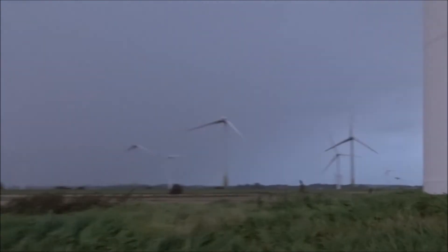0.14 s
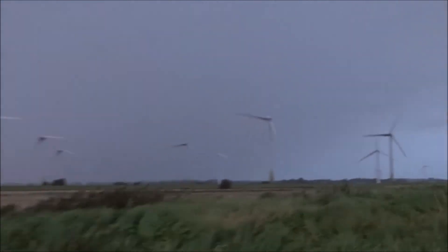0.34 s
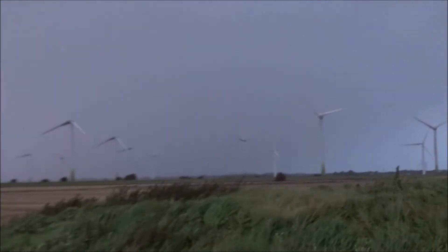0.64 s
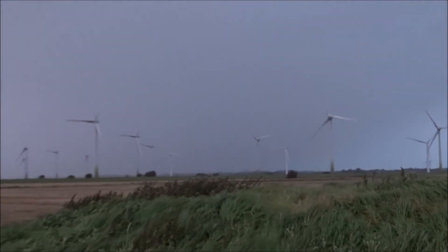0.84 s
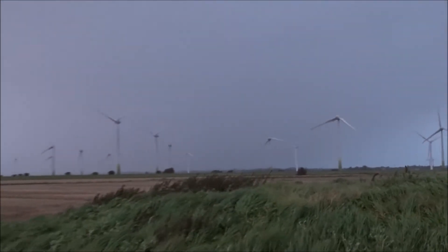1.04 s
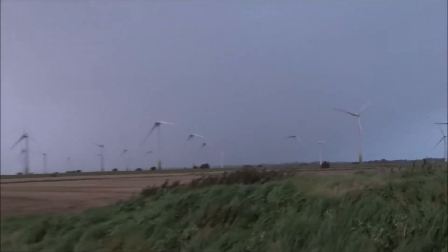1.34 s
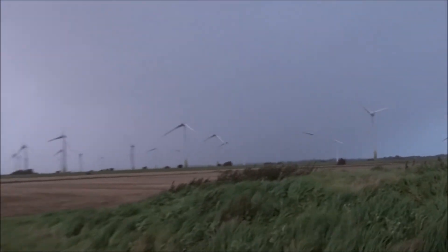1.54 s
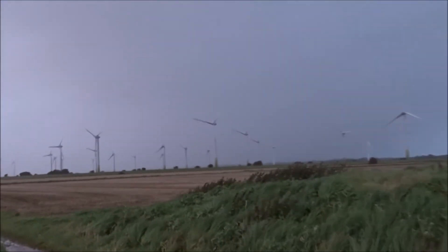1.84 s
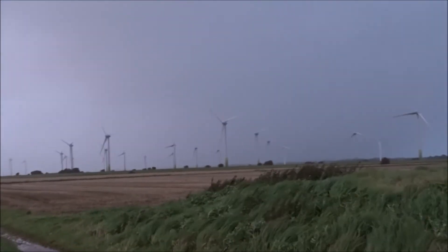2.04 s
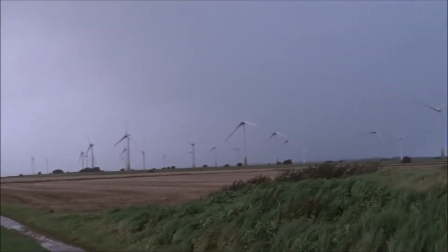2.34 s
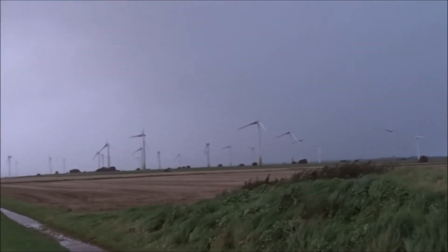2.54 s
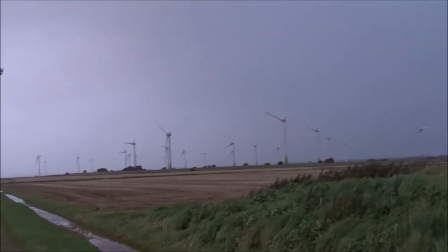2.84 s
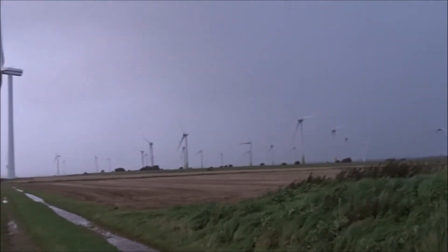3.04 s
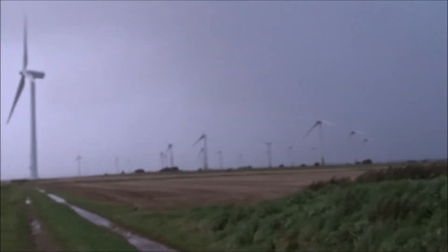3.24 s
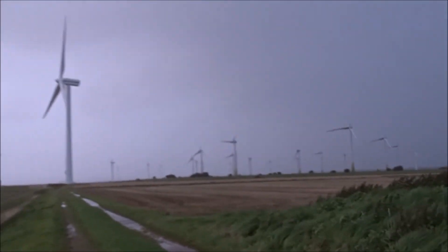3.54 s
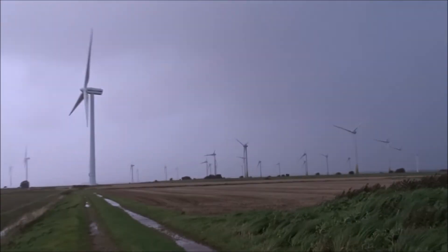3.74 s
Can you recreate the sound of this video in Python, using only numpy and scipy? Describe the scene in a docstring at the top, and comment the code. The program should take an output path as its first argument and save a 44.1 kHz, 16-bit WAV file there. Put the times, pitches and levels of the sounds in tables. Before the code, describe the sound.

Storm wind blows straight onto the microphone outdoors, a low, ragged roar with short crackles. It swells, dips to let a soft hiss of grass through, then returns in one hard gust and blows on more gently.

```python
"""Storm gusts cross an open field and buffet the two microphone ports of a hand-held camera.
From the start, one wind strength drives a rumble, a fluttering roar, a ragged tearing and a sizzle,
and the hardest eddies (swirls of air) spit. The gusts build between 1.2 and 2 s. In the lull after that,
long grass hisses beside the camera, over the faint rush of the open land. A hard gust hits at 2.7 s,
then the wind blows on more gently and the grass fades out at the end."""
import sys
import numpy as np
from scipy import signal
from scipy.fft import rfft, irfft, next_fast_len
from scipy.io import wavfile
from scipy.ndimage import uniform_filter1d, map_coordinates

SR = 44100
rng = np.random.default_rng(int(sys.argv[2]) if len(sys.argv) > 2 else 0)


def inscribe(sig):
    """Save sig as 16-bit PCM at rate SR to the path in sys.argv[1].

    A 1-D sig is mono; a 2-D sig holds one channel per row.
    Samples are clipped to [-1, 1] before scaling.
    """
    pcm = np.round(np.clip(np.atleast_2d(sig).T, -1, 1) * 32767)
    wavfile.write(sys.argv[1], SR, pcm.astype(np.int16))


N = 171108

# how alike the wind sounds at the two ports: pitch_hz, likeness (-1 opposite, 1 the same)
PORT_LIKENESS = [(40, .94), (90, .87), (140, .64), (220, 0), (380, -.6), (750, -.74), (1400, -.6),
                 (2200, -.35), (3200, .06), (5000, .55), (8000, .68), (14000, .75)]
# which side the wind is louder on: pitch_hz, left_minus_right_db
PORT_BALANCE = [(30, 1.3), (80, 3.5), (170, 6.3), (350, 4.3), (700, -.3), (1400, -1.7), (3000, -.7),
                (12000, -1)]
# which side the grass and the land are louder on: pitch_hz, left_minus_right_db
FIELD_BALANCE = [(3000, -0.68), (12000, -2)]


def amp(db):
    """Turn decibels into a number to multiply by."""
    return 10 ** (np.asarray(db) / 20)


def unit(x):
    """Scale a signal to an average (rms) level of 1."""
    return x / np.sqrt(np.mean(x ** 2) + 1e-20)


def at_pitch(rows, hz):
    """Read (pitch_hz, value) rows at any pitch, on a log scale."""
    pitches, values = np.transpose(rows)
    return np.interp(np.log(hz + 1), np.log(pitches + 1), values)


def over_time(rows):
    """Join (time_s, value) rows into one value per sample."""
    return np.interp(np.arange(N) / SR, *np.transpose(rows))


def wobble(per_s):
    """A smooth curve through per_s random values a second."""
    return map_coordinates(rng.standard_normal(N // 16), [np.arange(N) * per_s / SR], mode="wrap")


def filtered(x, gain_at):
    """Turn each pitch up or down by gain_at(hz)."""
    size = next_fast_len(N + SR // 2)
    hz = np.fft.rfftfreq(size, 1 / SR)
    return irfft(rfft(x, size) * gain_at(hz), size)[..., :N]


def rush(tone, likeness=PORT_LIKENESS, balance=PORT_BALANCE, shake_db=0):
    """Stereo noise of level 1, shaken by shake_db and then given its tone."""
    def mid_and_side_gains(hz):
        width = np.arccos(np.clip(at_pitch(likeness, hz), -.99, .99)) / 2
        return amp(at_pitch(tone, hz)) * np.array([np.cos(width), np.sin(width)])

    noise = rng.standard_normal((2, N)) * amp(shake_db)
    mid, side = filtered(noise, mid_and_side_gains)
    stereo = np.array([mid + side, mid - side])
    return unit(filtered(stereo, lambda hz: amp(np.outer([1, -1], at_pitch(balance, hz) / 2))))


def patchy(x, depth_db):
    """Make a sound uneven, with loud and soft patches in time and pitch."""
    grid = signal.stft(x, nperseg=512)[2]
    patches = uniform_filter1d(rng.standard_normal(grid.shape[1:]), size=9, axis=0)  # across pitch
    patches = uniform_filter1d(patches, size=6, axis=1)  # across time
    uneven = signal.istft(grid * amp(depth_db * unit(patches)), nperseg=512)[1]
    return unit(uneven[:, :N])


def land():
    """Wind over the fields makes a faint, steady rush."""
    # tone of the rush: pitch_hz, level_db
    tone = [(30, 7), (150, -2), (400, -23), (900, -18), (2000, -29), (5000, -33), (12000, -73)]
    return amp(-45.5) * rush(tone, likeness=[(100, 0.98), (2000, 1.0)], balance=FIELD_BALANCE)


def grass():
    """Blades brush each other in a restless hiss; now and then a tuft whips over with a swish."""
    # how the hiss swells and fades: time_s, level_db
    hiss_levels = [(0, -46.5), (.08, -54), (.22, -62), (.5, -58), (.85, -58), (1.0, -47.5), (1.1, -55.5),
                   (1.25, -48.5), (1.45, -58), (1.55, -60), (1.85, -53), (2.0, -60), (2.17, -51.5),
                   (2.48, -51.5), (2.7, -65), (3.05, -67), (3.3, -56.5), (3.44, -59), (3.55, -57),
                   (3.7, -61), (3.88, -84)]
    # tufts whipping over: middle_s, length_s, level_db
    tufts = [(0.044, 0.035, -49), (0.925, 0.02, -47), (1.023, .02, -52), (1.136, 0.024, -41),
             (2.303, 0.025, -47), (2.385, 0.0058, -48), (2.46, .05, -56), (3.52, .04, -52)]
    # tones of the hiss and the brighter swish: pitch_hz, level_db
    hiss_tone = [(1500, -25), (3500, -2), (5300, 6), (6700, 0.5), (8400, 0.5), (9800, 4), (11000, 0.5),
                 (13000, 3), (14500, 2.5), (15700, 0)]
    swish_tone = [(3000, -12), (5500, 7), (7000, -6), (9000, -2), (11000, -3), (13000, 3), (14500, 6),
                  (15700, 3)]
    # how alike left and right sound: pitch_hz, likeness (1 the same)
    likeness = [(3000, 1), (7000, 0.88), (10000, 0.33), (13500, 0.65)]
    t = np.arange(N) / SR
    whips = sum(amp(db) * np.exp(-((t - middle_s) / length_s) ** 2) for middle_s, length_s, db in tufts)
    rustle_db = 2.35 * wobble(per_s=45) + 1.5 * wobble(per_s=500)
    hiss = patchy(rush(hiss_tone, likeness, FIELD_BALANCE, shake_db=rustle_db), depth_db=3.5)
    swish = rush(swish_tone, likeness, FIELD_BALANCE, shake_db=rustle_db)
    return amp(0.5 + over_time(hiss_levels)) * hiss + amp(1) * whips * swish


def spits():
    """Each sharp eddy hits the ports as a bright, crackling puff that rises fast and dies away."""
    # sharp eddies: start_s, rise_s, level_db
    hits = [(0.068, 0.0077, -38), (0.1216, 0.0019, -31), (0.1471, 0.0021, -34), (0.17, 0.0035, -31),
            (0.335, .003, -40), (0.41, 0.0073, -35), (0.436, 0.002, -34), (0.5111, 0.0011, -34),
            (0.551, .0015, -32), (0.587, 0.0022, -35), (0.614, .001, -34), (0.623, .001, -32),
            (0.6424, .002, -38), (0.7612, 0.0015, -31.5), (1.184, .002, -37), (1.3214, 0.0019, -26),
            (1.337, .001, -28), (1.364, 0.0026, -31), (1.4467, 0.0021, -30), (1.497, .0013, -32),
            (1.531, 0.004, -31.5), (1.542, 0.0037, -31), (1.5933, .0013, -34), (1.637, .003, -35),
            (2.069, 0.0012, -41), (2.572, 0.0017, -51), (2.67, .003, -37), (2.721, .0013, -30),
            (2.7295, 0.0019, -26.5), (2.7566, 0.0024, -32), (2.7684, 0.0016, -33), (2.81, .003, -34),
            (2.823, .001, -35), (2.8324, 0.0011, -35), (2.877, 0.0023, -36), (2.956, 0.0028, -36),
            (3.71, .003, -36), (3.7868, .002, -37)]
    # tone of a puff: pitch_hz, level_db
    tone = [(300, -20), (1000, 8), (3000, 8.5), (5000, 7), (6500, 0.5), (8500, 0), (15500, -27)]
    puffs = np.zeros(N)
    for start_s, rise_s, level_db in hits:
        age = np.clip((np.arange(N) / SR - start_s) / rise_s, 0, None)  # 1 at the peak
        puffs += amp(level_db) * age * np.exp(1 - age)
    return amp(-5.5) * puffs * rush(tone, shake_db=3.3 * wobble(per_s=860))


def buffeting():
    """Eddies at the ports shake five layers of noise together; the high ones break up into crackle."""
    # wind strength at the ports: time_s, level_db
    gusts = [(0,-28.5), (0.07,-28.5), (0.105,-35), (0.125,-25.5), (0.14,-30.5), (0.18,-25.5), (0.24,-30.5),
             (0.285,-49.5), (0.325,-32.5), (0.365,-45.5), (0.385,-36), (0.4,-25), (0.44,-25.5),
             (0.48,-27.5), (0.535,-43.5), (0.553,-23.5), (0.61,-21.5), (0.66,-25.5), (0.7,-20.5),
             (0.81,-20.5), (0.875,-26), (0.91,-22.5), (0.965,-41), (1.0,-25.5), (1.025,-40), (1.042,-28),
             (1.09,-44.5), (1.12,-28.5), (1.148,-24.5), (1.175,-34.5), (1.22,-17.5), (1.245,-23),
             (1.28,-20.5), (1.325,-14), (1.41,-15.5), (1.48,-39), (1.498,-18.5), (1.55,-18.5), (1.585,-25),
             (1.63,-20), (1.665,-22), (1.75,-14.5), (1.82,-18), (1.9,-12), (1.97,-22), (2.065,-18.5),
             (2.095,-35), (2.13,-22.5), (2.2,-55), (2.225,-28.5), (2.285,-22.5), (2.345,-50.5), (2.395,-52),
             (2.42,-26), (2.49,-40.5), (2.54,-42.5), (2.575,-18.5), (2.605,-32.5), (2.67,-24),
             (2.695,-27.5), (2.725,-11.5), (2.78,-23), (2.835,-17.5), (2.855,-31.5), (2.878,-22),
             (2.96,-21.5), (3.06,-22), (3.115,-28.5), (3.17,-23.5), (3.2,-33.5), (3.217,-19.5),
             (3.29,-19.5), (3.36,-22.5), (3.385,-31), (3.405,-18.5), (3.45,-31), (3.472,-19.5),
             (3.55,-25.5), (3.62,-29.5), (3.66,-22), (3.77,-23.5), (3.88,-26)]
    # slow drift of each layer's level: time_s, deep_db, rumble_db, roar_db, tear_db, sizzle_db
    drift = [(0, -25, -24.5, 0, -40, -41), (0.22, -25, -22, 0, -39, -42),
             (0.42, -25, -26.5, 1.5, -37, -39.5), (0.7, -31.5, -26.5, -0.5, -41.5, -43.5),
             (1.1, -29, -28, 0, -41, -38), (1.4, -26.5, -24.5, 0.5, -40.5, -40.5),
             (1.65, -31, -24, -1, -38.5, -39.5), (1.9, -35.5, -23.5, 0.5, -42.5, -41),
             (2.3, -30.5, -27, 0.5, -45, -44.5), (2.55, -27.5, -23.5, -1.5, -44, -45.5),
             (2.74, -28.5, -23.5, 2, -40.5, -42), (2.88, -31, -23.5, 0.5, -42.5, -44),
             (3.05, -36, -24.5, -.5, -46.5, -44), (3.45, -39, -21.3, -0.5, -44.5, -44),
             (3.88, -32, -26, -0.5, -44, -43)]
    # big slow eddies that thump the ports: middle_s, length_s, deep_boost_db
    thumps = [(0.14, 0.013, -2), (0.405, 0.02, 5), (1.363, 0.025, 7.5), (1.646, 0.049, 5.5),
              (1.94, .025, 9), (2.607, 0.028, 11), (2.69, 0.027, 4), (3.27, 0.051, 5)]
    # the camera turns the left port into the wind: time_s, left_minus_right_db
    camera_turn = [(0, -0.7), (1.7, 0.4), (2.2, 1.6), (3.88, 0.2)]
    # tones of the five layers, low to high: pitch_hz, level_db
    deep_tone = [(15, -26), (28, -0.5), (50, 4.5), (85, 7.5), (115, 3.5), (160, -4.5), (400, -55)]
    rumble_tone = [(50, -17.5), (90, -2), (130, 2.5), (190, 1), (260, -3.5), (340, -10.5), (500, -20),
                   (1000, -80)]
    roar_tone = [(100, -22.5), (200, -4), (300, -1), (420, -1.5), (650, -7), (950, -15), (1300, -23),
                 (2200, -43), (5000, -70)]
    tear_tone = [(250, -18), (600, 1.5), (1250, 1.5), (2000, -6.5), (3200, -16), (4500, -27), (6400, -29),
                 (12000, -43)]
    sizzle_tone = [(1200, -19), (2500, 8.5), (4000, 3.5), (5300, 0), (6400, -12), (8500, -4.5),
                   (11000, -18), (15500, -33)]

    t = np.arange(N) / SR
    gust_db = over_time(gusts) + 26  # 0 is an average gust
    deep_db, rumble_db, roar_db, tear_db, sizzle_db = (
        over_time(np.array(drift)[:, [0, column]]) for column in range(1, 6))
    thump_db = sum(db * np.exp(-((t - middle_s) / length_s) ** 2) for middle_s, length_s, db in thumps)
    eddies = np.tanh(wobble(per_s=65))
    flutter = wobble(per_s=190)
    crackle = wobble(per_s=860)

    deep = rush(deep_tone, shake_db=1.3 * eddies)
    rumble = rush(rumble_tone, shake_db=0.42 * eddies)
    roar = rush(roar_tone, shake_db=1.6 * eddies + 2.0 * flutter)
    tear = rush(tear_tone, shake_db=2.1 * eddies + 2.08 * flutter + 1.6 * crackle)
    sizzle = rush(sizzle_tone, shake_db=2.0 * eddies + 1.05 * flutter + 3.3 * crackle)

    # each layer follows its own share of the gust: the roar most, the deep bass least
    low = (amp(0.5 + deep_db + thump_db + 0.27 * gust_db) * deep
           + amp(0.5 + rumble_db + 0.65 * gust_db) * rumble
           + amp(-26 + roar_db + 0.97 * gust_db) * roar)
    high = (amp(6.5 + tear_db + 0.71 * gust_db) * patchy(tear, depth_db=1.17)
            + amp(-7 + sizzle_db + 0.6 * gust_db) * patchy(sizzle, depth_db=2.0))
    left_right_gains = amp(np.outer([1, -1], over_time(camera_turn) / 2))
    return left_right_gains * low + high


def gain_control(x):
    """The camera turns itself down during the loudest gusts."""
    limit_db, share_removed, average_s = -17.5, 0.51, 0.0188
    power = uniform_filter1d(np.mean(x ** 2, axis=0), int(average_s * SR))
    excess_db = np.maximum(10 * np.log10(np.abs(power) + 1e-12) - limit_db, 0)
    return x * amp(-share_removed * excess_db)


def scene():
    """Wind on the ports, in front of the grass and the land."""
    return buffeting() + spits() + grass() + land()


def record(dry):
    """The camera holds down and rounds off the biggest swings, then dulls and cuts the highest treble."""
    # the microphone's weak top end: pitch_hz, gain_db
    top_end = [(13300, -0.5), (14600, -14), (15700, -8)]
    overload_level, highest_hz = 0.5, 15700
    held = gain_control(dry)
    rounded = held / (1 + np.abs(held / overload_level) ** 6) ** (1 / 6)
    return filtered(rounded, lambda hz: amp(at_pitch(top_end, hz)) * (hz < highest_hz))


dry = scene()
out = record(dry)
inscribe(out)
```